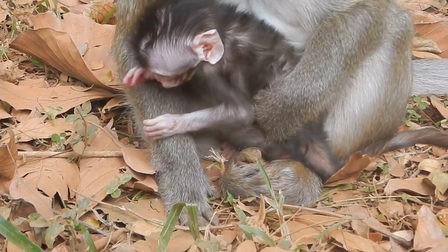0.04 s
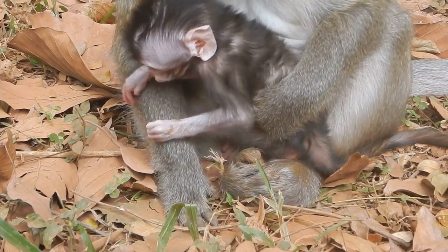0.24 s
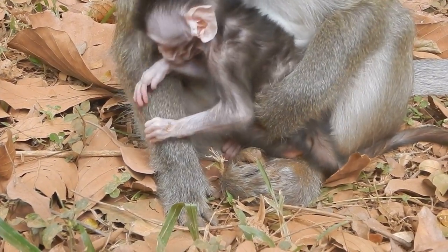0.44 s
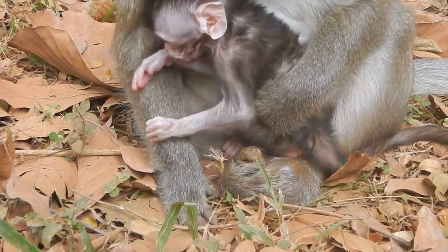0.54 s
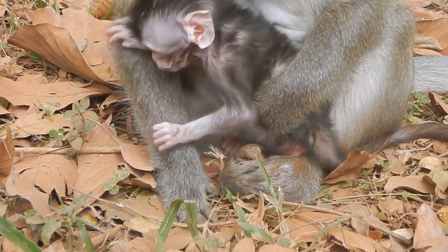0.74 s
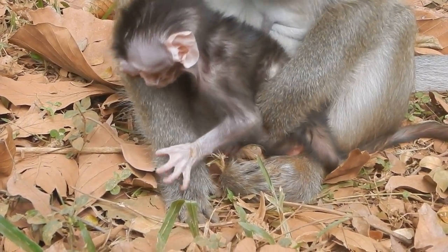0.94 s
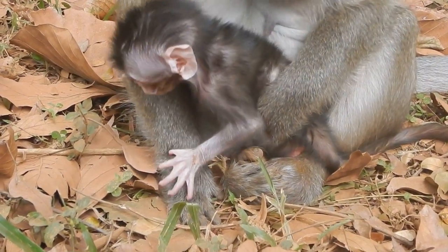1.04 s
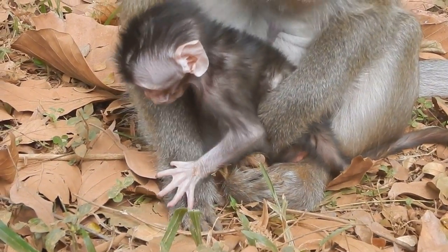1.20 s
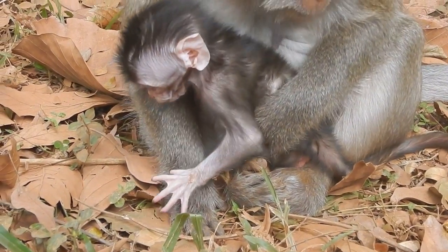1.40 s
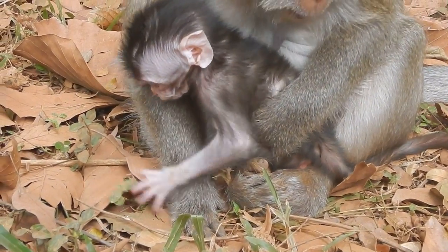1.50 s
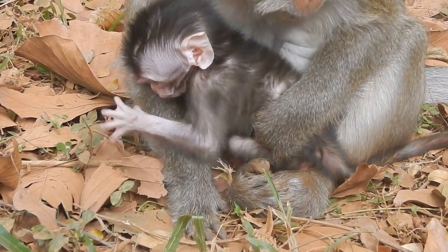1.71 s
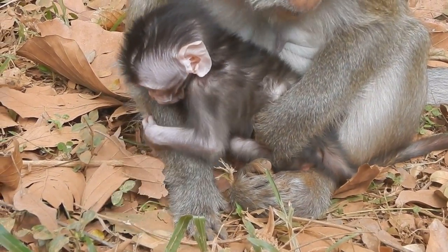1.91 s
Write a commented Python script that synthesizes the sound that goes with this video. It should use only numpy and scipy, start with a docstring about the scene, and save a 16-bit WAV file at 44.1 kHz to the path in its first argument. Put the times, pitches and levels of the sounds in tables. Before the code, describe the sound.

Dry leaves crackle and rustle in short, scattered bursts as monkeys shift on them.

```python
"""Monkeys on dry leaves

Monkeys shift on fallen leaves, first off to the right, then in front. The leaves break by brittle
fracture: clumps of snaps over a fine crackle that swells with each movement, with low knocks from
stiff leaves and twigs. A distant call, faint outdoor air and a low rumble lie underneath."""
import sys
import numpy as np
from scipy import signal
from scipy.fft import rfft, irfft
from scipy.io import wavfile
from scipy.ndimage import uniform_filter1d

SR = 44100
rng = np.random.default_rng(int(sys.argv[2]) if len(sys.argv) > 2 else 0)


def inscribe(sig):
    """Save sig as 16-bit PCM at rate SR to the path in sys.argv[1].

    A 1-D sig is mono; a 2-D sig holds one channel per row.
    Samples are clipped to [-1, 1] before scaling.
    """
    pcm = np.round(np.clip(np.atleast_2d(sig).T, -1, 1) * 32767)
    wavfile.write(sys.argv[1], SR, pcm.astype(np.int16))


N = 85995
TIME, FREQ = np.arange(N) / SR, np.fft.rfftfreq(N, 1 / SR)


def leaves():
    """Superposition: snaps, knocks and crackle add, located by level and phase differences."""
    # spectra of a breaking leaf, crisp top and dull body: f/Hz, relative level/dB
    crisp_spectrum = [(3000, -50.5), (4050, -16.5), (4550, -6), (5200, -5.5), (6250, -2.5), (7600, -7),
                      (8500, -19), (9700, -24.5), (10500, -39), (11500, -38), (15500, -59)]
    body_spectrum = [(200, -52), (900, -49), (1500, -15.5), (2050, -7), (2500, -7), (2950, -8.5),
                     (3400, -12), (3800, -16.5), (4500, -33), (9000, -90)]
    # left port minus right port, for each direction: f/Hz, level difference/dB
    right_balance = [(300, -2.5), (800, -1.5), (2400, -1.5), (3500, 1), (4200, -10.5), (5000, -18),
                     (6200, -9.5), (7500, -11), (9000, -9), (10400, 0), (15000, 14)]
    front_balance = [(300, 0), (800, -1.7), (3400, -1.3), (5000, 1.5), (7200, 2.4), (10400, 2)]
    # lead of the left port: f/Hz, phase/rad
    right_phase = [(100, 1.1), (2500, -0.66), (3700, -1.4), (4220, 1.1), (5680, 1.53), (7700, 1),
                   (9470, -1.6)]
    front_phase = [(100, 0.52), (3360, -0.23), (4220, 0.71), (7320, 1.3), (9220, 1.2)]
    crisp, body = impulse_response(crisp_spectrum), impulse_response(body_spectrum)
    rustle = snaps(crisp, body) + knocks() + crackle(crisp, body)
    front = np.clip((TIME - 1.47) / 0.072, 0, 1)  # crossfade from right to front at 1.47 s
    return (ports(*(rustle * (1 - front)), right_balance, right_phase)
            + ports(*(rustle * front), front_balance, front_phase))


def snaps(crisp, body):
    """Brittle fracture: a ragged burst excites a crisp and a dull resonance. Returns two variants."""
    # t/s, crisp peak level/dB, crisp f/Hz, body peak level/dB, body f/Hz, duration/s
    events = [(0.017, -43, 6800, -49, 1660, .002), (.0616, -39, 6500, -46, 1650, .002),
              (0.082, -41.5, 5000, -50, 2780, .0014), (0.202, -44, 5930, -45, 2050, 0.0043),
              (0.207, -45, 5000, -47, 2700, 0.0026), (0.2185, -26.5, 5050, -38.5, 1870, .003),
              (0.229, -21, 5860, -33, 2980, 0.0025), (0.2463, -26, 5670, -54, 2820, .0013),
              (0.2534, -23, 6150, -32.5, 2870, 0.0014), (0.2552, -21, 6030, -33, 2770, 0.0045),
              (.361, -36.5, 6120, -54, 2800, .0014), (0.399, -31.5, 5700, -40, 2320, 0.0019),
              (0.459, -35.5, 5640, -55, 2800, 0.0019), (0.6509, -19, 5900, -28.5, 2860, 0.0021),
              (0.693, -37.5, 5440, -44.5, 2670, .002), (0.815, -25, 6140, -41.5, 2800, 0.0037),
              (0.883, -38, 6000, -46.5, 1570, 0.001), (0.9304, -34.5, 6880, -57, 2830, .0026),
              (0.9676, -30, 6530, -39, 1870, 0.0026), (0.982, -25, 6400, -54, 2940, 0.004),
              (0.998, -31.5, 5900, -54, 2800, 0.0031), (1.0174, -12, 6500, -38, 2230, .0018),
              (1.021, -21, 6500, -26, 3200, 0.003), (1.0274, -25, 5500, -28.5, 3070, 0.0025),
              (1.0594, -25.5, 7000, -45, 2920, 0.004), (1.065, -27, 6200, -42, 2100, 0.0011),
              (1.0953, -20.5, 6150, -45, 3060, 0.0043), (1.109, -31, 6600, -48, 2800, 0.0032),
              (1.1193, -20, 6800, -43, 2140, 0.0016), (1.1305, -25, 4760, -34.5, 3340, .005),
              (1.135, -28.5, 6560, -46, 3030, .003), (1.1645, -35, 4850, -48, 3230, 0.005),
              (1.1827, -28.5, 5700, -47, 3030, 0.0015), (1.186, -35, 6400, -52, 2050, 0.0024),
              (1.2556, -41, 5630, -53, 3130, 0.0027), (1.2932, -36.5, 5160, -49.5, 3500, 0.0013),
              (1.3063, -40, 6400, -47.5, 2880, 0.0021), (1.3448, -34, 4950, -38.5, 2980, 0.0021),
              (1.384, -43, 5600, -41.5, 3080, 0.0047), (1.3878, -38, 4800, -38, 2280, 0.0061),
              (1.3913, -37.5, 6700, -39.5, 2940, 0.0051), (1.4205, -37, 5600, -45, 2300, .003),
              (1.616, -55, 6900, -48, 1750, 0.0022), (1.6303, -55, 5000, -44.5, 1820, .003),
              (1.638, -45, 5400, -46, 1840, 0.0037), (1.644, -42, 6700, -50, 1900, 0.0015),
              (1.665, -51, 5960, -44.5, 1890, 0.0083), (1.678, -37, 5100, -45, 2240, 0.003),
              (1.773, -41.5, 4450, -50.5, 2990, 0.0014)]
    crisp_width_hz, body_width_hz = 1450, 403
    rise_s, tail_s, tail_db, tick_db = 0.0003, 0.0056, -17, -40
    out, t = np.zeros((2, N + 2048)), np.arange(1024) / SR

    def envelope(decay_s):
        swell = 1 - np.exp(-(t / (rise_s + 0.17 * decay_s)) ** 2)
        return swell * (np.exp(-(t / decay_s) ** 2) + amp(tail_db) * np.exp(-t / tail_s))

    for start, crisp_db, crisp_hz, body_db, body_hz, length in events:
        noise = rng.standard_normal((5, 1024))
        ragged = amp(2.5 * unit_rms(uniform_filter1d(noise[4], 20)))
        at = round((start - rise_s) * SR)
        for k in range(2):
            burst = noise[k] * ragged
            out[k, at:at + 1024] += amp(crisp_db + tick_db) * burst * envelope(length / 3)
            top = np.convolve(ring(burst * envelope(length / 2), crisp_hz, crisp_width_hz), crisp)
            drive = np.convolve(noise[k + 2] * ragged * envelope(0.38 * length), body)
            low = unit_rms(ring_twice(drive, body_hz, body_width_hz)) + 0.53 * unit_rms(drive)
            out[k, at:at + len(top)] += at_peak(top, crisp_db) + at_peak(low, body_db)
    return out[:, :N]


def crackle(crisp, body):
    """Shot noise: tiny random fractures each ring at one of eight pitches. Returns two variants."""
    # stirring of the leaves: t/s, crisp level/dB, body level/dB
    stir = [(0, -65.5, -66.5), (.1, -62, -64), (0.183, -53.5, -59), (.21, -44.5, -51), (.265, -51.5, -55),
            (.29, -51, -58.5), (.41, -47.5, -58), (0.439, -49, -55), (.455, -60, -66.5), (.49, -49, -56.5),
            (.51, -44, -56), (0.546, -39.5, -51), (.59, -48, -55.5), (.615, -57, -65.5), (.67, -53.5, -63),
            (.755, -58.5, -64), (.795, -69, -80), (.803, -50.5, -59), (.83, -64, -64.5), (.87, -61.5, -69),
            (.9, -55, -64), (0.971, -48, -51), (1.0, -48, -56), (1.024, -34, -48), (1.05, -45, -53),
            (1.09, -47, -56), (1.136, -56, -58.5), (1.15, -54, -70), (1.22, -63.5, -73),
            (1.32, -63.5, -66.5), (1.39, -51.5, -56.5), (1.45, -52.5, -60.5), (1.52, -66.5, -72),
            (1.6, -63.5, -67.5), (1.638, -50.5, -58.5), (1.66, -57.5, -63), (1.69, -48, -56.5),
            (1.729, -49, -53), (1.747, -68.5, -78), (1.85, -58.5, -60), (1.9, -74.5, -80)]
    # knocking within the crackle: f/Hz, relative level/dB
    knock_spectrum = [(150, -30), (550, -6.5), (850, -2), (1150, -6), (1500, -6), (2600, -56.5)]
    grains_per_s, spread_db, width_hz = 7000, 3, 680
    clump_db, clump_s = 1.5, 0.0043
    pitches_hz = np.geomspace(4450, 8270, num=8)
    times, crisp_db, body_db = np.transpose(stir)
    clumps = amp(clump_db * unit_rms(uniform_filter1d(rng.standard_normal(N), int(clump_s * SR))))
    sizes = clumps * amp(spread_db * np.minimum(rng.exponential(1, N), 3))
    breaks = rng.random(N) < grains_per_s / SR
    pitch_index = rng.integers(0, len(pitches_hz), N)
    dull = body + amp(-3.5) * impulse_response(knock_spectrum)
    out = []
    for grains, body_grains in sizes * breaks * rng.standard_normal((2, 2, N)):
        modes = sum(unit_rms(ring(grains * (pitch_index == k), hz, width_hz))
                    for k, hz in enumerate(pitches_hz))
        rung = unit_rms(modes) + 0.89 * unit_rms(grains)
        top = unit_rms(signal.oaconvolve(rung, crisp)[:N]) * amp(np.interp(TIME, times, crisp_db))
        drive = unit_rms(body_grains) * amp(np.interp(TIME, times, body_db))
        out.append(top + signal.oaconvolve(drive, dull)[:N])
    return out


def knocks():
    """Impact excitation: a short blow on a stiff leaf or twig rings one low, damped resonance."""
    # t/s, f/Hz, peak level/dB
    events = [(0.0607, 1150, -41.5), (.217, 780, -45), (0.228, 780, -44), (0.2534, 610, -43),
              (.651, 850, -40.5), (0.815, 985, -41), (1.021, 980, -36), (1.03, 214, -50.5),
              (1.136, 576, -45), (1.688, 1230, -41)]
    decay_s = 0.0027
    out, t = np.zeros(N + 2048), np.arange(2048) / SR
    for start, hz, db in events:
        blow = uniform_filter1d(rng.standard_normal(2048), size=8) * np.exp(-t / decay_s)
        thud = ring_twice(np.gradient(np.gradient(blow)), hz, width_hz=0.5 * hz)
        out[round(start * SR):][:2048] += at_peak(thud, db)
    return out[:N]


def ports(sound, variant, balance, phase):
    """Two-point reception: two microphone ports differ in level and phase, and slightly in waveform."""
    coherence = 0.97
    half = amp(curve(balance, FREQ) / 2) * np.exp(0.5j * curve(phase, FREQ))
    left, right = rfft(cohere(sound, variant, coherence)) * half, rfft(sound) / half
    return irfft(np.array([left, right]) * 2 / abs(half + 1 / half).clip(1), N)


def call():
    """Interference: a tone beats with narrow-band noise, giving a faint, unsteady, distant whistle."""
    start_s, length_s, hz = 0.01, 0.11, 1670
    progress = np.clip((TIME - start_s) / length_s, 0, 1)
    envelope = abs(np.sin(np.pi * progress)) ** 0.14 * (progress < 1)
    fuzz = unit_rms(ring_twice(rng.standard_normal(N), hz, width_hz=250))
    return amp(-60.5) * (np.sin(2 * np.pi * hz * TIME) + 0.93 * fuzz) * envelope


def air():
    """Partial coherence: a softly patchy outdoor hush, least alike left and right in the treble."""
    # f/Hz, relative spectral level/dB
    spectrum = [(90, -26.5), (150, -1), (250, 2.5), (340, -4.5), (808, -4), (2240, -14.5), (2830, -17),
                (3780, -23.5), (4780, -17), (7080, -18), (9940, -30), (15500, -31)]
    # f/Hz, coherence between the ports
    coherence = [(60, 0.52), (150, 0.59), (380, 0.35), (950, 0.68), (2380, 0.24), (5980, 0.085),
                 (15000, 0.044)]
    level_db, patch_db = -58, 2
    frames, hz = N // 256 + 5, np.fft.rfftfreq(1024, 1 / SR)
    real, imag, other_real, other_imag, patches = rng.standard_normal((frames, 513, 5)).T
    patches = unit_rms(uniform_filter1d(uniform_filter1d(patches, 10, axis=0), 10, axis=1))
    left = real + 1j * imag
    right = cohere(left, other_real + 1j * other_imag, curve(coherence, hz)[:, None])
    bins = np.array([left, right]) * amp(curve(spectrum, hz)[:, None] + patch_db * patches)
    return amp(level_db) * unit_rms(signal.istft(bins, nperseg=1024, noverlap=768)[1][:, :N])


def rumble():
    """Amplitude modulation: very low noise comes and goes, like light wind on the ports."""
    # t/s, level/dB
    levels = [(0, -65), (.3, -78.5), (.47, -70.5), (.61, -84), (1.04, -80), (1.28, -76.5), (1.95, -69.5)]
    # f/Hz, relative level/dB
    spectrum = [(15, -40), (30, -15), (50, 11.5), (80, -2), (110, 4.5), (150, -39)]
    left, other = rng.standard_normal((2, N))
    bins = rfft([left, cohere(left, other, coherence=0.62)]) * amp(curve(spectrum, FREQ))
    return unit_rms(irfft(bins, N)) * amp(np.interp(TIME, *np.transpose(levels)))


def amp(db):
    return 10 ** (np.asarray(db) / 20)


def unit_rms(x):
    return x / np.sqrt(np.mean(x ** 2) + 1e-20)


def at_peak(x, db):
    return amp(db) * x / abs(x).max()


def cohere(x, other, coherence):
    """Independent noises add in power: the mix keeps the given coherence with x."""
    return coherence * x + np.sqrt(1 - coherence ** 2) * other


def curve(points, hz):
    """Interpolation on a logarithmic frequency axis."""
    f, value = np.transpose(points)
    return np.interp(np.log(hz + 1), np.log(f + 1), value)


def impulse_response(spectrum):
    """Minimum phase: the causal response of a spectrum, with unit energy."""
    log_gain = np.log(amp(curve(spectrum, abs(np.fft.fftfreq(4096, 1 / SR)))))
    phase = -signal.hilbert(log_gain).imag
    return unit_rms(np.fft.ifft(np.exp(log_gain + 1j * phase)).real[:1024]) / 32


def ring(x, hz, width_hz):
    """Damped resonance: a two-pole filter driven by x."""
    r = np.exp(-np.pi * width_hz / SR)
    return signal.lfilter([1 - r], [1, -2 * r * np.cos(2 * np.pi * hz / SR), r * r], x)


def ring_twice(x, hz, width_hz):
    return ring(ring(x, hz, width_hz), hz, width_hz)


def scene():
    """Superposition of the leaves and their background."""
    return leaves() + air() + rumble() + call()


def record(dry):
    """Linear filtering: the microphone's narrow dip and band limit, then a small constant offset."""
    notch_hz, half_width_hz, notch_db = 2503, 50.5, -19
    edge_hz, offset = 15870, -0.0006
    notch = amp(notch_db / (1 + ((FREQ - notch_hz) / half_width_hz) ** 2))
    dipped = irfft(rfft(dry) * notch, N)
    lowpass = signal.firwin(1023, edge_hz, window=("kaiser", 9), fs=SR)
    return signal.oaconvolve(dipped, lowpass[None], "same") + offset


dry = scene()
out = record(dry)
inscribe(out)
```